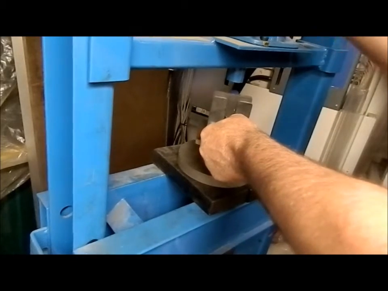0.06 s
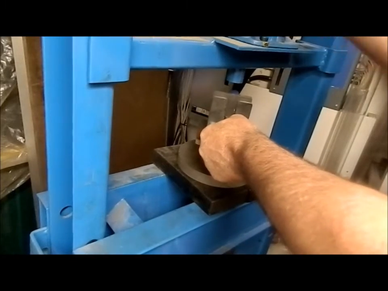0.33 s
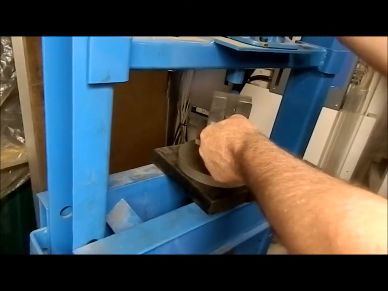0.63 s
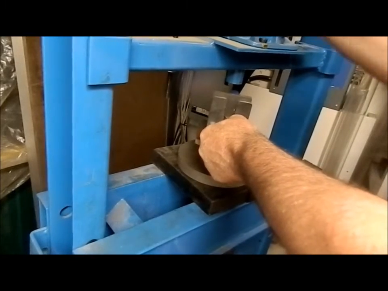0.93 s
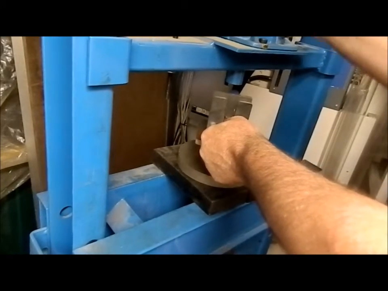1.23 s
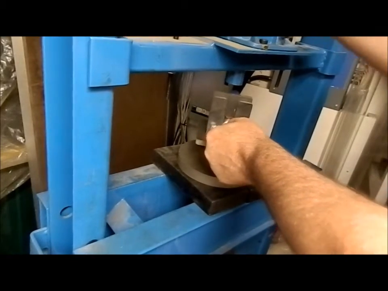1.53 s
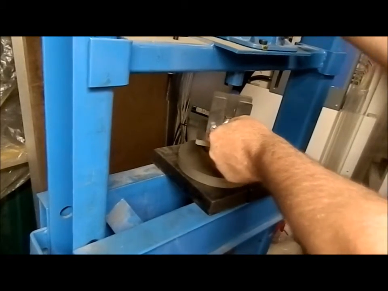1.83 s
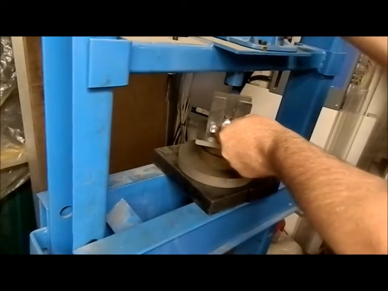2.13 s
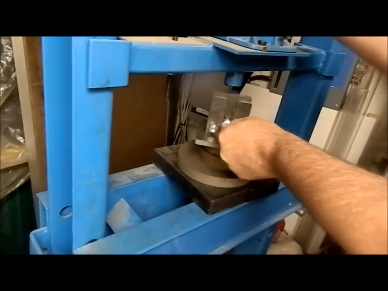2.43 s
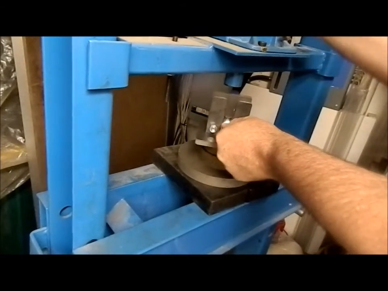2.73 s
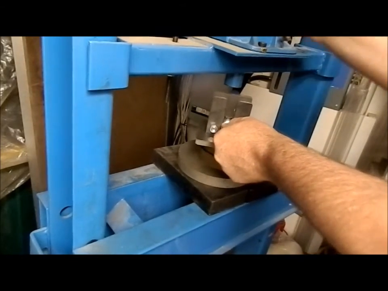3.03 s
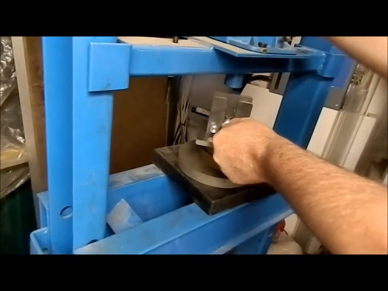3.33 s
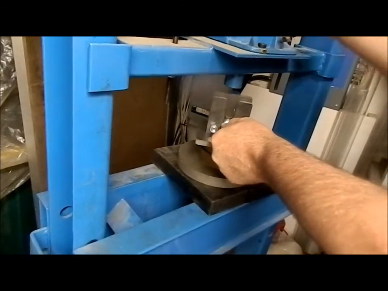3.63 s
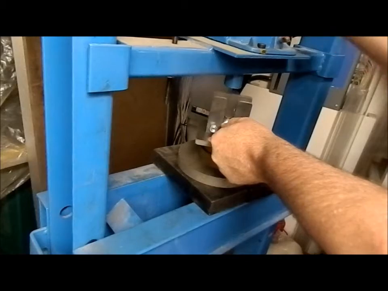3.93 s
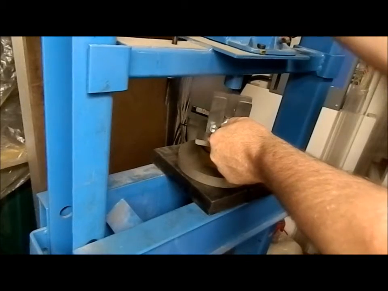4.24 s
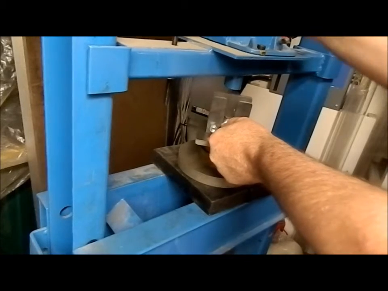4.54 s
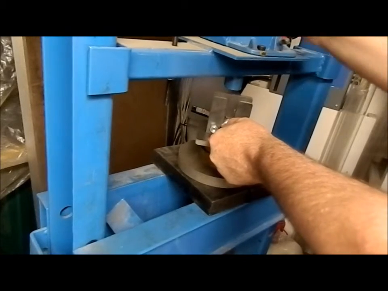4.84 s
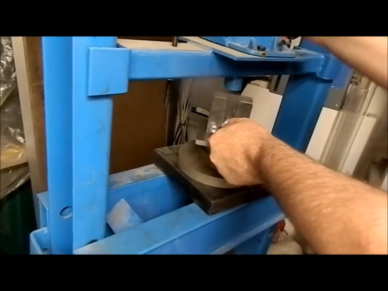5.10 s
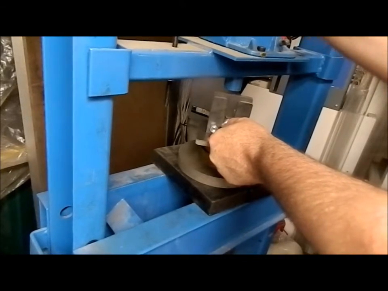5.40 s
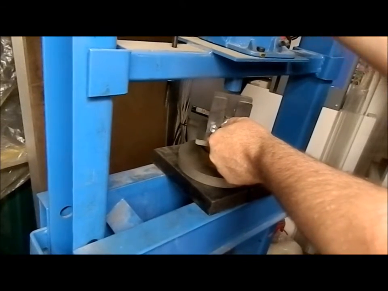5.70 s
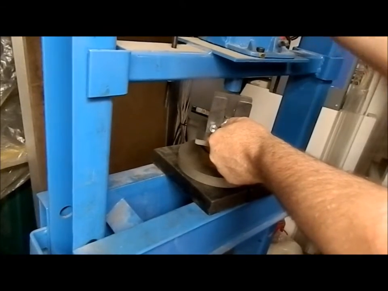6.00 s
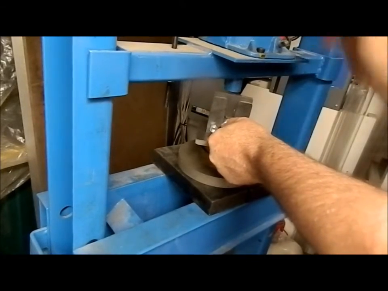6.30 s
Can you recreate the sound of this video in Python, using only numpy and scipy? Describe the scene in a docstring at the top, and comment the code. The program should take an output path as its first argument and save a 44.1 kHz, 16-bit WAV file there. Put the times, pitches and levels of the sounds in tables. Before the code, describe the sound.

A hydraulic shop press is already being pumped by hand at the start, heard close up in a small workshop. Its steel lever clacks sharply against its stop about four times a second, evenly, until the last hit at about 6.1 seconds. Just before each clack the loose lever takes up its play with a short chink; just after, it rebounds with a light, chattering tick. Thin steel tones ring on from stroke to stroke, and the heavy frame answers each hit with a short hollow knock. Faint ticks fall between the clacks. At about 2.1 seconds the workpiece scrapes briefly and quietly over its plate and settles with a soft bump. From around 2 seconds the leading chinks grow firmer, making the strokes sound more doubled, while the clacks stay about equally loud. A short room echo and faint steady air lie underneath.

```python
"""Hand-pumped hydraulic shop press

Close up in a small workshop, about four strokes a second. Each stroke: the loose lever takes up
its play with a rattle, clacks against its stop, rebounds and ticks on the way back. The steel
linkage rings; the heavy frame answers a moment later. The workpiece is nudged once over its plate."""
import sys
import numpy as np
from scipy import signal
from scipy.fft import rfft, irfft, next_fast_len
from scipy.io import wavfile
from scipy.ndimage import uniform_filter1d

SR = 44100
rng = np.random.default_rng(int(sys.argv[2]) if len(sys.argv) > 2 else 0)


def wav_record(signal):
    """Record a signal, one row per channel, as 16-bit PCM in the file named by sys.argv[1]."""
    frames = np.transpose(np.atleast_2d(signal))
    bounded = np.clip(frames, -1, 1)
    # unit amplitude maps onto the largest positive 16-bit level
    quanta = np.round(bounded * 32767).astype(np.int16)
    wavfile.write(sys.argv[1], SR, quanta)


N = 284886
AGE_S = np.arange(SR * 3 // 4) / SR

# modes of bars and plates, lever, frame (knock, hollow note), valve: f/Hz, level/dB, t60/s
STEEL_MODES = [(338, -8.5, 1.6), (804, -5.5, 1.3), (864, -8, .5), (979, -5, .33), (1082, 2.5, .32),
               (1086, -11, 1.2), (1302, -3.5, .45), (2341, -1, .2), (2409, -5, .55), (2602, -9, .5),
               (2672, -5, .4), (3288, -12, 1.2), (3418, -.5, .25), (3459, -11, 1.1), (3530, -4.5, .2),
               (3624, -3, .45), (3731, 4, .36), (3752, -3, .9), (4060, -10, .5), (4243, 7, .23),
               (4426, -1, .33), (4598, -6, .33), (4720, -4, .3), (5415, -14, .35)]
LEVER_MODES = [(1211, -2, .072), (1468, 0, .05), (1701, 3, .045), (1910, 0, .035), (2231, -7.5, .076),
               (2600, -4, .072), (2810, 2, .023), (3115, -4.5, .02), (3420, -1.5, .1), (3640, -6.5, .15),
               (3853, -3, .055), (4184, -2.5, .055), (4365, 0, .049), (4460, -8.5, .11), (5202, -16.5, .13),
               (5460, -10, .08), (6760, -8.5, .034)]
KNOCK_MODES = [(122, -21.5, .22), (188, -13, .14), (255, -12, .08), (316, 4, .1), (361, 4, .11),
               (410, -13, .07)]
HOLLOW_MODES = [(553.5, -22, 0.28), (765.6, 7.5, 0.086), (824.5, -4, 0.1), (1006.7, 7, 0.058)]
VALVE_MODES = [(1680, 1.5, 0.073), (1994, 10.5, 0.022), (2206, 11.3, 0.023)]
# noise spectra of the contacts and the room air: f/Hz, relative level/dB
CHINK_SPECTRUM = [(200, -11.5), (600, -5), (950, 6), (1300, 1), (2600, 3), (3550, 7), (4300, -4),
                  (5300, -2), (7200, -4.5), (7850, -21), (8500, -4), (11300, -9), (15500, -16)]
CRACK_SPECTRUM = [(40, -39), (150, -51), (300, -0.5), (600, -22.5), (1000, -7.5), (1600, 1), (3000, 2),
                  (4400, -7.5), (5200, -3), (7900, -12.5), (10000, -13.5), (15500, -21)]
JANGLE_SPECTRUM = [(60, -56), (200, 6.5), (500, 0.5), (1000, 5), (2200, 0), (3200, 2), (4300, 9),
                   (5200, -9), (7200, -14), (7850, -15.5), (8500, -7.5), (11000, -17.5), (15500, -24)]
PIN_SPECTRUM = [(1000, -50), (6000, -28), (8400, 2.5), (9300, -1), (10200, -24), (11200, 9),
                (12300, 0), (15500, -17)]
SCRAPE_SPECTRUM = [(100, -28), (360, -11), (440, 10), (600, -1), (900, -7), (2800, -6.5),
                   (5000, -20), (15000, -29)]
AIR_SPECTRUM = [(20, -21), (80, -21), (120, -12), (200, -13), (336, -5), (560, -17), (800, -9), (1500, -19),
                (3500, -22), (6000, -32), (16000, -48)]
# lever takes up its play, firmer as pumping goes on: t/s, level/dB, pin glint/dB
TAKE_UPS = [(0.1011, -14, -53), (0.36, -17.5, -33.5), (0.622, -21.5, -41), (0.8782, -15, -28.5),
            (1.1346, -15, -29.5), (1.3858, -11, -32), (1.6395, -14.5, -33), (1.9003, -8.5, -48),
            (2.169, -9, -35), (2.434, -8, -32), (2.688, -9, -37), (2.9439, -7.5, -34), (3.2009, -10.5, -43),
            (3.4636, -8, -40), (3.7208, -6.5, -33), (3.9805, -8, -32), (4.2368, -6, -34),
            (4.4881, -4.5, -36), (4.7437, -7, -30), (5.003, -5.5, -29), (5.2606, -5, -33),
            (5.5162, -10, -34), (5.77, -6, -24), (6.0235, -6, -29)]
# lever hits its stop: t/s, level/dB, knock/dB re level, ring/dB re level, floor thud/dB, focus f/Hz
CLACKS = [(.169, -3, -22, -31.5, -60.5, 1970), (0.4196, -1, -24, -35.5, -57, 1620),
          (0.6842, -1.5, -16, -34.5, -58, 2100), (0.9358, -3, -15.5, -28.5, -51, 3880),
          (1.1945, -1, -18.5, -31, -38, 3930), (1.4441, -1.5, -16.5, -32, -58, 1630),
          (1.7055, -.5, -19, -32, -44, 2070), (1.953, 0, -23, -32.5, -45, 2600),
          (2.2319, -2.5, -24.5, -32, -51.5, 2730), (2.5061, -1, -16, -30.5, -63.5, 1620),
          (2.7493, -0.5, -22.5, -31, -38, 1205), (3.003, -1, -23.5, -33, -51, 1190),
          (3.2661, -1, -22.5, -38, -45, 1700), (3.5285, -1, -25, -32.5, -52, 1700),
          (3.786, -2, -29, -33, -50, 1510), (4.0515, -4, -15.5, -28, -54, 3350),
          (4.3007, -2.5, -21, -30, -52, 1900), (4.5456, 1.5, -30, -36, -38, 2700),
          (4.814, -4, -14.5, -37, -59, 1880), (5.0659, 0, -31, -33, -55, 2510),
          (5.324, -3, -23.5, -32.5, -52, 1970), (5.5797, -0.5, -15.5, -30, -53, 3570),
          (5.8305, -1.5, -24, -36.5, -43, 2880), (6.082, -3, -20.5, -34.5, -55, 1780)]
# lever rebounds: t/s, level/dB
REBOUNDS = [(0.2181, -21.5), (0.483, -24.5), (.742, -18), (1.0029, -23), (1.258, -27), (1.4976, -21.5),
            (1.7614, -22.5), (2.0217, -28.5), (2.2777, -25.5), (2.5588, -21), (2.809, -25.5), (3.0615, -28),
            (3.3247, -22.5), (3.5811, -25), (3.8276, -25), (4.0973, -21), (4.3536, -25), (4.6015, -24),
            (4.8684, -22.5), (5.121, -20), (5.3747, -25.5), (5.6242, -23), (5.8889, -29)]
# pin catches on the way back: t/s, level/dB
CATCHES = [(1.5742, -31), (3.6631, -28), (4.683, -25.5), (5.213, -24), (5.7126, -23.5)]
# workshop decay: f/Hz, t60/s
ROOM_DECAY = [(100, 1), (500, 0.33), (2500, 0.32), (6000, 0.32), (15000, 0.31)]

TYPICAL_TAKE_UP_DB, TYPICAL_CLACK_DB, TYPICAL_THUD_DB = -7, -3.5, -50
SLIDE_LEAD_S, SLIDE_DB, SQUEAK_HZ = 0.013, -29.5, 2870
CRACK_DB, CLANK_DB, JANGLE_DB = -6.5, -21.5, -19.5  # re clack level
FOCUS_DB, FOCUS_OCT = 6, 0.083  # the contact point favours one band
TURN_JITTER_S, VALVE_DB, TICK_DB = 0.0036, -40, -35
WALL_S, WALL_DB, ROOM_DB, AIR_DB = 0.0135, -18, -10.5, -49


def amp(db):
    """Decibels to gain."""
    return 10 ** (np.asarray(db) / 20)


def unit_rms(x):
    """Scale to rms 1."""
    return x / np.sqrt(np.mean(x ** 2) + 1e-20)


def along(points, hz):
    """Interpolate (f/Hz, value) points on a log axis."""
    f, value = np.transpose(points)
    return np.interp(np.log(hz + 1), np.log(f + 1), value)


def filtered(x, response):
    """Apply the zero-phase gain response(hz)."""
    size = next_fast_len(len(x) + 2048)
    return irfft(rfft(x, size) * response(np.fft.rfftfreq(size, 1 / SR)), size)[:len(x)]


def treble(x, gain_db):
    """High shelf at 4.8 kHz."""
    return filtered(x, lambda hz: amp(gain_db * hz ** 4 / (hz ** 4 + 4800.0 ** 4)))


def bass(x, gain_db):
    """Low shelf at 240 Hz."""
    return filtered(x, lambda hz: amp(gain_db / (1 + (hz / 240) ** 6)))


def noise(spectrum, size=len(AGE_S)):
    """Coloured noise, rms 1."""
    return unit_rms(filtered(rng.standard_normal(size), lambda hz: amp(along(spectrum, hz))))


def fade(t60_s, age_s=AGE_S):
    """Exponential decay."""
    return np.exp(-np.log(1000) * age_s / t60_s)


def rise(rise_s, power=1, age_s=AGE_S):
    """Onset from 0 to 1; a higher power holds it back, then steepens it."""
    return 1 - np.exp(-(age_s / rise_s) ** power)


def add(track, t_s, sound):
    """Mix sound into track at t_s."""
    start = max(round(t_s * SR), 0)
    part = track[start:start + len(sound)]
    part += sound[:len(part)]


def ring(modes, scatter_db, detune):
    """Damped modes; each blow lands differently and shares itself out anew."""
    hz, db, t60_s = np.transpose(modes)[:, :, None]
    size, pitch, phase = rng.standard_normal((3, len(modes), 1))
    tones = np.sin(2 * np.pi * (hz * (1 + detune * pitch) * AGE_S + phase))
    return np.sum(amp(db + scatter_db * size) * fade(t60_s) * tones, axis=0)


def steel():
    """Bars and plates: thin tones that last from stroke to stroke."""
    return ring(STEEL_MODES, scatter_db=2.5, detune=0.0003)


def slides():
    """The pin sticks and slips before it seats: a scuff, plus a squeak when pressed firmly."""
    out = np.zeros(N)
    for t_s, db, _ in TAKE_UPS:
        firmer_db = db - TYPICAL_TAKE_UP_DB
        scuff = noise(CHINK_SPECTRUM) * fade(0.21) * rise(0.0011)
        squeak_hz = SQUEAK_HZ * (1 + 0.029 * rng.standard_normal())
        squeak = np.sin(2 * np.pi * squeak_hz * AGE_S) * np.exp(-((AGE_S - 0.004) / 0.0039) ** 2)
        slip = scuff + amp(-5 + 0.7 * firmer_db) * squeak
        add(out, t_s - SLIDE_LEAD_S, amp(SLIDE_DB + 0.83 * firmer_db) * slip)
    return out


def take_ups():
    """The pin seats with a chink, duller when firm, and lightly loads the frame."""
    out = np.zeros(N)
    for t_s, db, glint_db in TAKE_UPS:
        firmer_db = db - TYPICAL_TAKE_UP_DB
        chink = treble(noise(CHINK_SPECTRUM), -0.5 - 0.12 * firmer_db) * fade(0.083)
        seat = amp(-11) * chink + amp(-22) * lever() + amp(-33.5) * steel()
        add(out, t_s, amp(db) * seat + amp(glint_db) * pin())
        answer = frame(knock_db=db - 13.5, hollow_db=db - 10.5, swell_s=0.02)
        add(out, t_s - 0.004, bass(answer, -6.5))
    return out


def lever():
    """Short, bright clank, damped by the hand."""
    return ring(LEVER_MODES, scatter_db=5.5, detune=0.0056)


def pin():
    """High glint of the small hard pin; modes too dense to resolve."""
    return noise(PIN_SPECTRUM) * fade(0.091)


def frame(knock_db, hollow_db, swell_s):
    """The heavy frame is slow to move: deep knock first, then a hollow note."""
    knock = amp(knock_db) * ring(KNOCK_MODES, scatter_db=1.5, detune=0.01)
    hollow = amp(hollow_db) * ring(HOLLOW_MODES, scatter_db=3.5, detune=0.016)
    return knock * rise(0.69 * swell_s, power=4) + hollow * rise(swell_s, power=4)


def clacks():
    """Lever on stop, steel on steel: crack, clank, jangle of loose parts, long ring, frame knock."""
    out = np.zeros(N)
    # pumping is under way at t = 0: steel and loose parts still sound
    add(out, 0, amp(-28) * steel()[SR // 5:])
    add(out, 0, amp(-42.5) * noise(CHINK_SPECTRUM) * fade(0.78))
    for (t_s, db, knock_db, ring_db, thud_db, focus_hz), (_, take_up_db, _) in zip(CLACKS, TAKE_UPS):
        dull_db = 0.2 * (db - TYPICAL_CLACK_DB)
        crack = treble(noise(CRACK_SPECTRUM), -0.5 - dull_db) * fade(0.031)
        jangle = treble(noise(JANGLE_SPECTRUM), 4 - dull_db) * fade(0.19)
        focus = lambda hz: amp(FOCUS_DB * np.exp(-(np.log2((hz + 1) / focus_hz) / FOCUS_OCT) ** 2))
        contact = filtered(amp(CRACK_DB) * crack + amp(CLANK_DB) * lever(), focus)
        blow = contact + amp(JANGLE_DB) * jangle + amp(ring_db) * steel()
        # a heavier thud chokes the hollow note; a firmer push stirs the lowest modes
        hollow_db = -17.5 - 0.62 * (thud_db - TYPICAL_THUD_DB)
        bass_db = 2 + 0.48 * (take_up_db - TYPICAL_TAKE_UP_DB)
        answer = bass(frame(knock_db, hollow_db, swell_s=0.017), bass_db)
        add(out, t_s, amp(db) * (blow * rise(0.00043) + answer) + amp(thud_db) * thud())
    return out


def thud():
    """One low push into the floor."""
    return np.sin(2 * np.pi * 55 * AGE_S) * fade(0.046)


def rebounds():
    """The lever falls back across its play: sharp tick, short chatter."""
    out = np.zeros(N)
    for t_s, db in REBOUNDS:
        contact = noise(CHINK_SPECTRUM) * (amp(-4.5) * fade(0.11) + amp(-16.5) * fade(0.01))
        answer = frame(knock_db=-8.5, hollow_db=-1, swell_s=0.016)
        add(out, t_s, amp(db) * (contact + amp(-26) * lever() + amp(-32) * steel() + answer))
    return out


def return_strokes():
    """The handle turns midway between clacks: dull valve snap, pin tick. At times the pin catches."""
    out = np.zeros(N)
    clack_s = np.array(CLACKS)[:, 0]
    for turn_s in clack_s[:-1] + 0.5 * np.diff(clack_s):
        snap = ring(VALVE_MODES, scatter_db=1, detune=0.09) * rise(0.00088)
        turn = amp(VALVE_DB) * snap + amp(TICK_DB) * tick()
        add(out, turn_s + TURN_JITTER_S * rng.standard_normal(), turn)
    for t_s, db in CATCHES:
        add(out, t_s, amp(db) * tick())
    return out


def tick():
    """A light touch of the pin."""
    return amp(-7) * noise(CHINK_SPECTRUM) * fade(0.1) + amp(-25) * pin()


def nudge(scrape_s=2.135, scrape_db=-32.5, bump_s=2.205, bump_db=-31):
    """The workpiece scrapes over its plate and settles with a bump."""
    push = amp(scrape_db) * np.exp(-((np.arange(N) / SR - scrape_s) / 0.037) ** 4)
    grit_db = 3 * unit_rms(uniform_filter1d(rng.standard_normal(N), size=200)) - 1
    out = push * amp(grit_db) * noise(SCRAPE_SPECTRUM, size=N)
    add(out, bump_s, amp(bump_db) * thud())
    return out


def workshop(x):
    """Short diffuse room tail; bass lasts longest."""
    hz, t_s, bins = signal.stft(rng.standard_normal(len(AGE_S)), SR, nperseg=256)
    decay = fade(along(ROOM_DECAY, hz)[:, None], t_s)
    _, tail = signal.istft(bins * decay, SR, nperseg=256)
    tail *= rise(0.0016, age_s=np.arange(len(tail)) / SR)
    return signal.fftconvolve(x, tail / np.linalg.norm(tail))[:N]


def scene():
    """Press, echo of the nearest wall, room tail, steady air."""
    press = slides() + take_ups() + clacks() + rebounds() + return_strokes() + nudge()
    wall = np.zeros(N)
    add(wall, WALL_S, amp(WALL_DB) * press)
    room = amp(ROOM_DB) * workshop(press)
    air = amp(AIR_DB) * noise(AIR_SPECTRUM, size=N)
    return (press + wall + room + air)[None]


def record(dry):
    """Soft peak limit, then a steep low-pass."""
    ceiling, cutoff_hz = 0.78, 15900
    rounded = dry[0] / (1 + (dry[0] / ceiling) ** 4) ** (1 / 4)
    return filtered(rounded, lambda hz: 1 / (1 + (hz / cutoff_hz) ** 120))[None]


dry = scene()
out = record(dry)
wav_record(out)
```